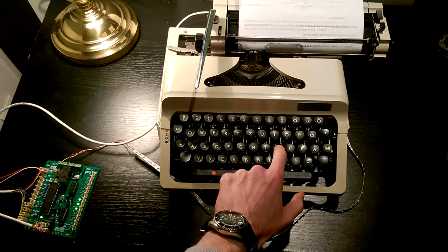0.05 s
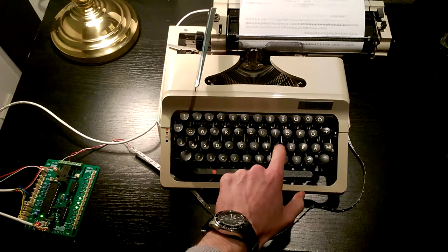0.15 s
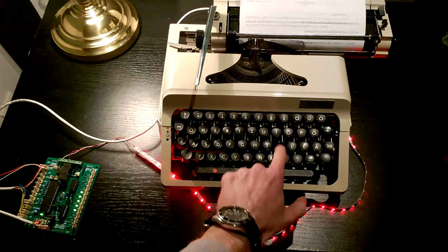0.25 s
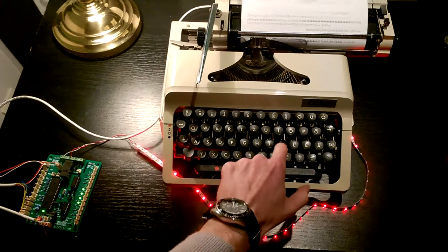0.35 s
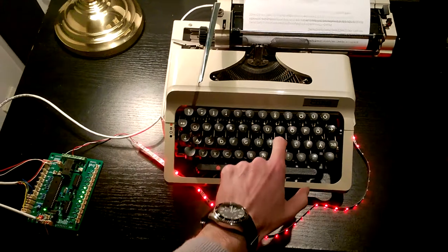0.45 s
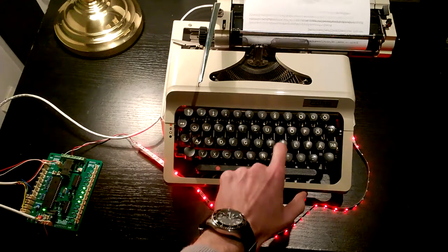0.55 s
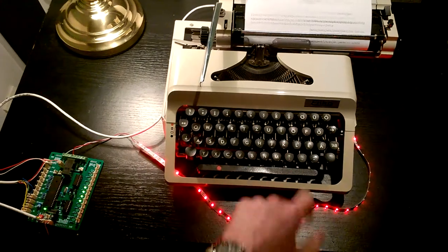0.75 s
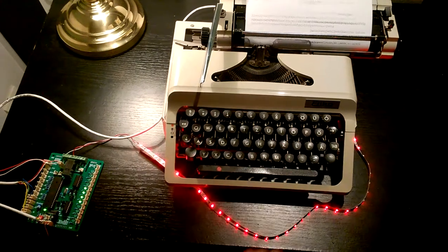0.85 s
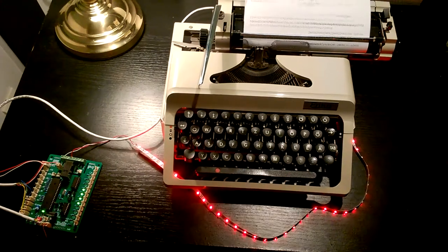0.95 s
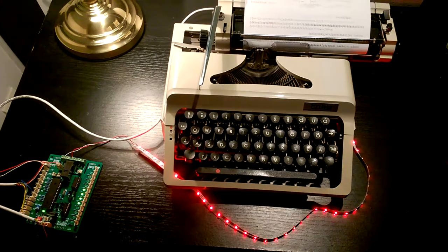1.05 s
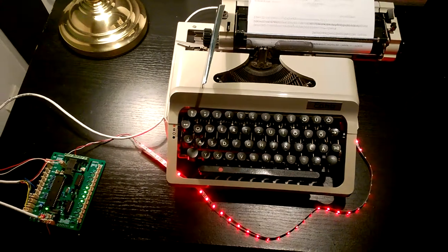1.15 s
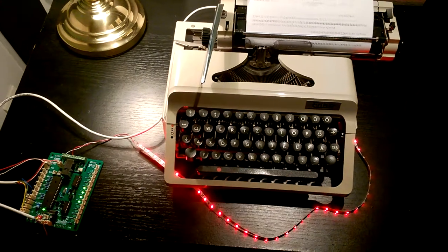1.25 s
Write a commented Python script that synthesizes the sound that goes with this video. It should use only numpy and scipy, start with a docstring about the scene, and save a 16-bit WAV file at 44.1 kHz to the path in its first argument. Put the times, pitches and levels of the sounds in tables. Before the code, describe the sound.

A single typewriter keystroke, close and mono in a small quiet room. Low rumble and faint air come first; tiny ticks and a thin spring zing begin around 0.16 s. At 0.21 s the type slug smacks hard and bright, rebounding at once, with steel ringing, type-bar rattle and a low desk thump. Softer clacks follow at 0.37 and 0.42-0.44 s, then the ring fades into quiet rumble and hum.

```python
"""Over a low rumble, soft air and a quiet hum, one key of a portable typewriter is pressed on a wooden desk.
The rumble dips briefly, then the linkage ticks (short noise clacks with a wash) and a spring zings (band noise).
The slug smacks the platen and rebounds, ringing the steel frame (damped sines); the type bars rattle (grainy noise).
The carriage steps and the type bar falls on its rest (clacks, damped sines). From the smack on, pushes knock
the case and make the desk boom (low swelling sines); the wash also stands for the small room's answer."""
import sys
import numpy as np
from scipy import signal
from scipy.fft import rfft, irfft
from scipy.io import wavfile
from scipy.ndimage import map_coordinates

SR = 44100
rng = np.random.default_rng(int(sys.argv[2]) if len(sys.argv) > 2 else 0)


def to_wav(sig):
    """Store sig (one row per channel, or 1-D mono) as 16-bit WAV at the path in sys.argv[1].

    Samples outside -1..1 are clipped; the rate is SR.
    """
    pcm = np.clip(np.atleast_2d(sig), -1, 1) * 32767
    pcm = np.round(pcm).astype(np.int16)
    wavfile.write(sys.argv[1], SR, pcm.T)  # frames by channels


N = 57330
T = np.arange(N) / SR  # seconds
HARD_RISE_S = 0.00092  # onset time constant of the frame, the spring and the rest


def amp(db):
    """Decibels to gain."""
    return 10 ** (np.asarray(db) / 20)


def along(points, hz):
    """(Hz, value) points read on a log frequency axis."""
    point_hz, values = np.transpose(points)
    return np.interp(np.log(hz + 1), np.log(point_hz + 1), values)


def fade(t60, t=T):
    """Exponential decay that loses 60 dB in t60 seconds."""
    return np.exp(-np.log(1000) * t / np.maximum(t60, 1e-4))


def rise(seconds):
    """Soft exponential onset with this time constant."""
    return 1 - np.exp(-T / max(seconds, 1e-5))


def swell(peak_s):
    """Smooth hump that reaches 1 after peak_s seconds and dies away."""
    u = T / peak_s
    return u * np.exp(1 - u)


def delayed(x, s):
    """x starting at time s in seconds."""
    return np.pad(x, (max(round(s * SR), 0), 0))[:N]


def wobble(rate):
    """A smooth random curve with rate knots a second."""
    return map_coordinates(rng.standard_normal(256), [T * rate], mode="mirror")


def noise(spectrum, tilt_db=0):
    """Coloured noise of rms 1, tilted in dB per octave above 500 Hz."""
    hz = np.fft.rfftfreq(2 * N, 1 / SR)
    octaves = np.log2(np.clip(hz, 500, SR))
    white = rng.standard_normal(2 * N)
    gain = amp(along(spectrum, hz) + tilt_db * octaves)
    x = irfft(rfft(white) * gain)[:N]
    return x / x.std()


RING_WAVER_RAD = .5  # phase waver for a wobble of 1


def ring(modes, rise_s):
    """Damped modes set off by one blow, each with its own slight phase waver."""
    total = 0
    for hz, db, t60 in modes:
        phase = 2 * np.pi * (hz * T + rng.random()) + RING_WAVER_RAD * wobble(70)
        total = total + amp(db) * fade(t60) * np.sin(phase)
    return rise(rise_s) * total


# Level of the room rumble. Each row: time in seconds, level in dB.
RUMBLE_LEVEL = [(0, -33.5), (.12, -59.5), (.18, -39), (.55, -41), (.66, -45), (.85, -46.5), (.91, -39),
                (1.1, -39), (1.3, -42.5)]
# Colour of the rumble. Each row: frequency in Hz, density in dB per Hz.
RUMBLE_COLOUR = [(12, -15), (28, 0.5), (52, -1), (72, -12), (110, -19), (170, -37.5), (400, -60),
                 (1000, -100)]


def rumble():
    """Low room noise whose level drifts."""
    level_db = np.interp(T, *np.transpose(RUMBLE_LEVEL))
    return amp(level_db) * noise(RUMBLE_COLOUR)


# Partials of the steady hum. Each row: frequency in Hz, level in dB.
HUM_PARTIALS = [(208, -67.5), (344.5, -80), (415.5, -78)]


def hum():
    """Faint steady sines, each from a random phase."""
    return sum(amp(db) * np.sin(2 * np.pi * (hz * T + rng.random())) for hz, db in HUM_PARTIALS)


# Colour of the room air. Each row: frequency in Hz, density in dB per Hz.
AIR_COLOUR = [(60, -2.5), (200, -1.5), (400, -10), (700, -17), (1500, -19.5), (3000, -23), (5700, -23.5),
              (7200, -34), (15500, -32)]
AIR_DB = -67


def air():
    """Soft steady noise of the room air."""
    return amp(AIR_DB) * noise(AIR_COLOUR)


# Pushes on the machine. Each row: start in seconds, desk boom in dB, boom pitch in Hz, case knock in dB.
PUSHES = [(.214, -34, 61, -32), (.24, -24, 72.35, -42), (0.361, -24.5, 75, -34.5),
          (.445, -34.5, 64.3, -32.5), (0.494, -33, 79.7, -56)]
# Resonances of the case. Each row: frequency in Hz, level in dB, t60 in seconds.
CASE_MODES = [(160, -6.5, 0.14), (243.6, -11, .15), (271, 0, .2), (356.2, -8.5, .18), (450, -14.5, .25),
              (591, -7.5, .12)]
BOOM_PEAK_S, BOOM_WAVER_RAD = .036, .6  # time to the boom's peak; phase waver for a wobble of 1
CASE_RISE_S = .004


def desk():
    """Each push knocks the case and swells into a low, wavering boom of the desk."""
    out = 0
    for s, boom_db, hz, knock_db in PUSHES:
        tone = np.sin(2 * np.pi * hz * T + BOOM_WAVER_RAD * wobble(50))
        boom = amp(boom_db) * swell(BOOM_PEAK_S) ** 3 * tone
        knock = amp(knock_db) * ring(CASE_MODES, CASE_RISE_S)
        out = out + delayed(boom + knock, s)
    return out


# Colour of the rattling type bars. Each row: frequency in Hz, density in dB per Hz.
RATTLE_COLOUR = [(800, -29.5), (2000, -5), (3000, 4), (4000, 5.5), (5800, -6), (7500, -13), (9500, -18.5),
                 (11600, -13.5), (13500, -25.5), (15500, -24.5)]
RATTLE_S, RATTLE_PEAK_S = .225, .07  # start; time from there to the peak
RATTLE_DB, RATTLE_PER_S = -38.5, 700  # level; grains a second


def basket():
    """The shaken type bars chatter against each other: noise with a fast random grain, swelling and dying."""
    grains = .5 + np.abs(map_coordinates(rng.standard_normal(N), [T * RATTLE_PER_S], order=1))
    chatter = noise(RATTLE_COLOUR) * grains / np.sqrt(np.mean(grains ** 2))
    return delayed(amp(RATTLE_DB) * swell(RATTLE_PEAK_S) ** 2 * chatter, RATTLE_S)


# Resonances of the type bar's rest. Each row: frequency in Hz, level in dB, t60 in seconds.
REST_MODES = [(1023, 3.5, 0.19), (1111, -10, 0.56), (1340, -3, 0.26), (1994, -7, 0.42), (2700, -10, .2),
              (2945, 2.5, 0.096)]
REST_S, REST_DB = .4395, -41.5


def rest():
    """The thrown type bar drops on its rest and sets its modes ringing."""
    return delayed(amp(REST_DB) * ring(REST_MODES, HARD_RISE_S), REST_S)


SPRING_S, SPRING_HZ, SPRING_WIDTH_HZ = .1658, 5520, 450
SPRING_DB, SPRING_T60 = -58, .1


def spring():
    """A spring zings as the key starts down: a fading narrow band of noise."""
    low_hz, high_hz = SPRING_HZ - 2 * SPRING_WIDTH_HZ, SPRING_HZ + 2 * SPRING_WIDTH_HZ
    zing = noise([(low_hz, -45), (SPRING_HZ, 0), (high_hz, -45)])
    return delayed(amp(SPRING_DB) * zing * rise(HARD_RISE_S) * fade(SPRING_T60), SPRING_S)


# Colour of the wash of springs, type bars and room. Each row: frequency in Hz, density in dB per Hz.
WASH_COLOUR = [(100, 5), (160, -0.5), (280, 2), (480, -3.5), (720, -10.5), (1100, -2.5), (2000, -0.5),
               (3000, -0.5), (4300, -0.5), (6000, -5), (7500, -14), (9500, -16.5), (12000, -16),
               (15500, -25)]
# Decay of the wash. Each row: frequency in Hz, t60 in seconds.
WASH_DECAY = [(200, 0.66), (1100, 0.65), (2500, 0.56), (5000, 0.56), (8000, .49), (14000, .34)]
WASH_RISE_S = 0.0074


def wash(tilt_db):
    """A dense noise tail whose treble dies first."""
    hz, t, bands = signal.stft(noise(WASH_COLOUR, tilt_db), SR, nperseg=256)
    t60 = along(WASH_DECAY, hz)[:, None]
    tail = signal.istft(bands * fade(t60, t), SR)[1][:N]
    return tail * rise(WASH_RISE_S)


# Contacts of the linkage, type bar and carriage. Each row: start in seconds, level in dB,
# brightness in dB per octave, rise in seconds, t60 in seconds, share ringing on in dB (on top of WASH_DB).
CONTACTS = [(0.1554, -55.5, -1, .001, 0.017, 0), (.181, -57, -2.5, .002, 0.1, -7.5),
            (0.1883, -48.5, -2, 0.0017, 0.067, -7), (0.1968, -40, 1.5, 0.00081, 0.063, -7),
            (0.2063, -26, 0.5, 0.0013, 0.11, -6.5), (0.2131, -16, 2, 0.00055, 0.043, 2),
            (0.2212, -18.5, 2, .0003, 0.01194, -5), (.243, -28.5, 0, .004, 0.088, -3),
            (0.3661, -22, -1, 0.0044, 0.05, -2.5), (.424, -26, -0.5, 0.0029, 0.061, -3.5),
            (0.4396, -28.5, -4, 0.00067, 0.032, -5), (0.4447, -28, -2, 0.0009, 0.036, -3.5)]
# Colour of a contact before its brightness tilt. Each row: frequency in Hz, density in dB per Hz.
CLACK_COLOUR = [(100, -9), (280, -3), (420, -10), (560, -4), (720, -14.5), (950, -8), (1300, -7.5),
                (2300, 2), (3500, -3), (5500, -5.5), (7200, -12.5), (9500, -18.5), (12000, -17.5),
                (15500, -28)]
WASH_DB = -12.5


def linkage():
    """Each contact is a short noise clack with its wash ringing on."""
    out = 0
    for s, db, tilt_db, rise_s, t60, wash_db in CONTACTS:
        clack = noise(CLACK_COLOUR, tilt_db) * rise(rise_s) * fade(t60)
        tail = amp(WASH_DB + wash_db) * wash(tilt_db)
        out = out + amp(db) * delayed(clack + tail, s)
    return out


# The slug meets the platen and rebounds. Each row: start in seconds, level in dB.
STRIKES = [(0.2136, -6.5), (.2215, -19.5)]
# The slug's short smack. Each row: frequency in Hz, level in dB, t60 in seconds.
SLUG_MODES = [(2554, -4.5, .018), (4750, -3, 0.013), (5020, -1.5, .014), (6900, -11, 0.0087),
              (8000, -8.5, .009), (11800, -21.5, 0.0079)]
# The steel frame and type basket. Each row: frequency in Hz, level in dB, t60 in seconds.
FRAME_MODES = [(1580, -9, .15), (1825, -13, .13), (1920, -6, .15), (2339, 2.5, 0.088), (2498, -4.5, 0.17),
               (2834, -2, .1), (3246, -2, 0.052), (3709, -5.5, .06), (4080, -2, .075), (4550, -6, .09),
               (4910, -4.5, .08), (5310, -8, .12), (6170, -7, .08), (7000, -12, .08), (8730, -13, .04)]
SLUG_RISE_S, FRAME_DB = 0.00025, -17  # onset of the smack; frame level added to its modes


def slug():
    """The type slug smacks the platen: short modes of the blow over the longer ring of the frame."""
    out = 0
    for s, db in STRIKES:
        smack = ring(SLUG_MODES, SLUG_RISE_S)
        frame = amp(FRAME_DB) * ring(FRAME_MODES, HARD_RISE_S)
        out = out + delayed(amp(db) * (smack + frame), s)
    return out


def scene():
    """The key stroke in its room, in mono."""
    typewriter = slug() + spring() + linkage() + basket() + rest() + desk()
    room = rumble() + hum() + air()
    return (typewriter + room)[None]


TOP_HZ = 15800  # gain is one half here


def record(dry):
    """The recorder's band limit: a very steep low-pass."""
    hz = np.fft.rfftfreq(2 * N, 1 / SR)
    gain = 1 / (1 + (hz / TOP_HZ) ** 160)
    return irfft(rfft(dry, 2 * N) * gain)[:, :N]


dry = scene()
out = record(dry)
to_wav(out)
```